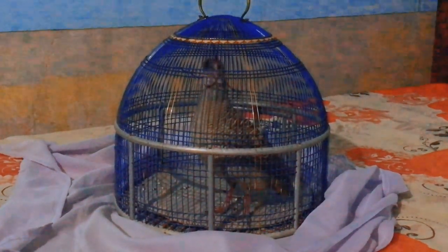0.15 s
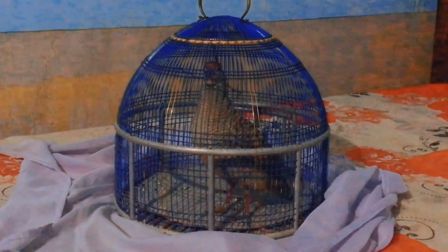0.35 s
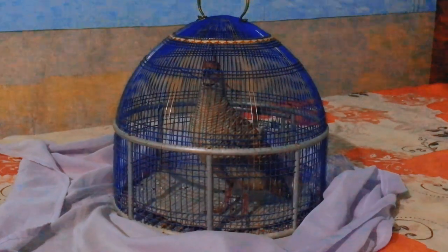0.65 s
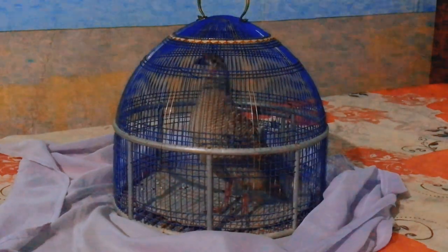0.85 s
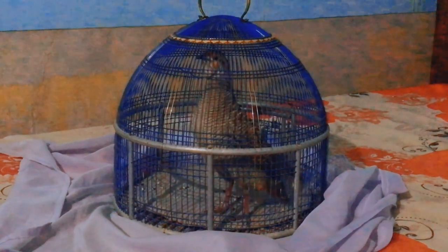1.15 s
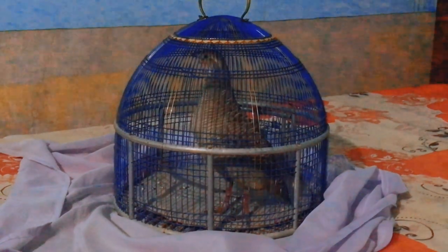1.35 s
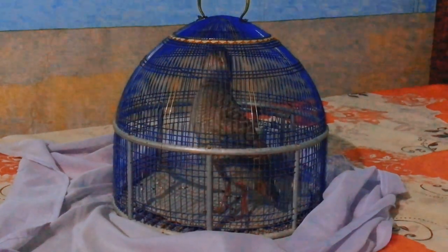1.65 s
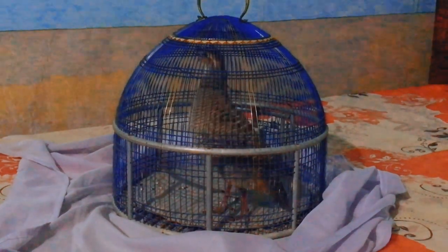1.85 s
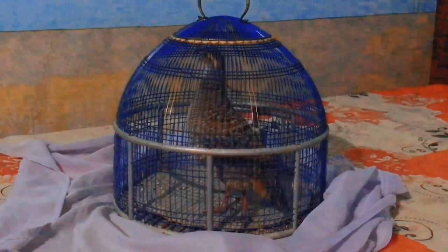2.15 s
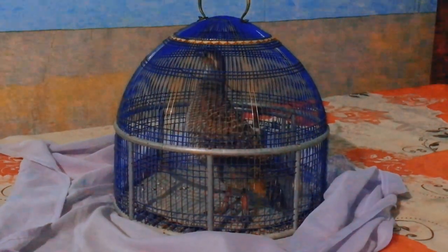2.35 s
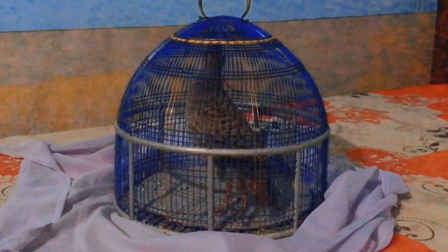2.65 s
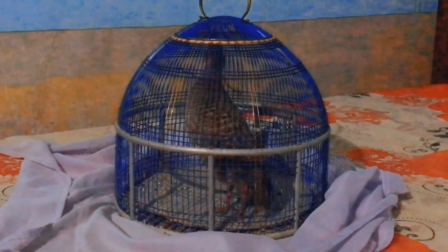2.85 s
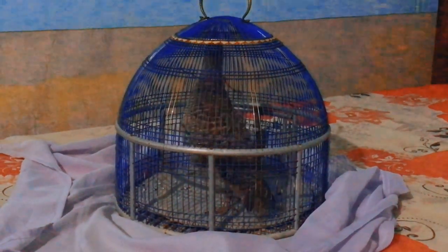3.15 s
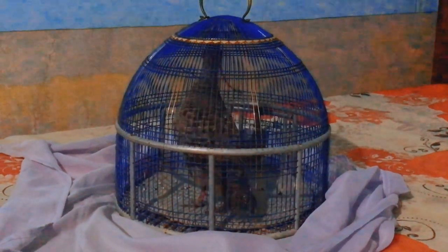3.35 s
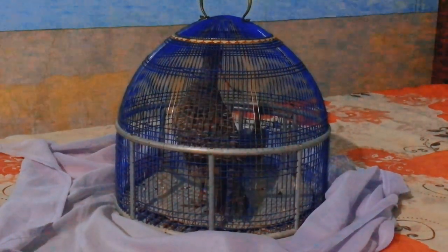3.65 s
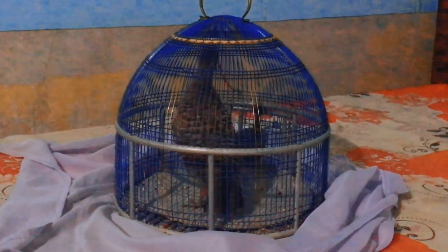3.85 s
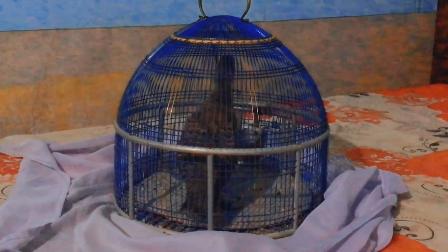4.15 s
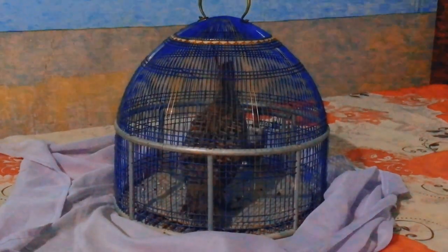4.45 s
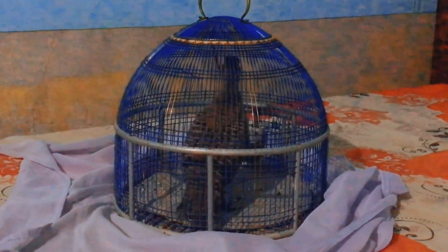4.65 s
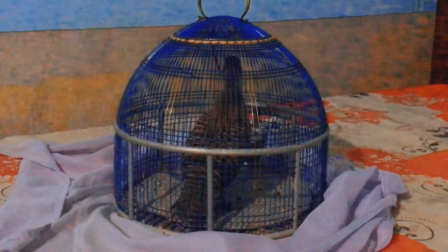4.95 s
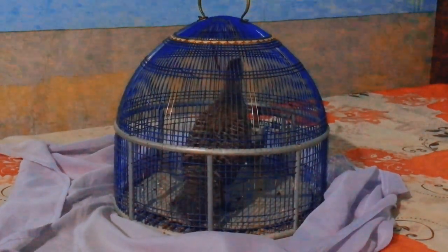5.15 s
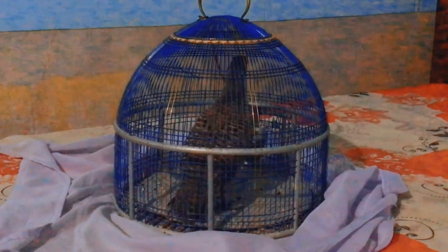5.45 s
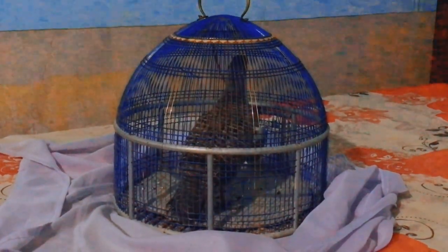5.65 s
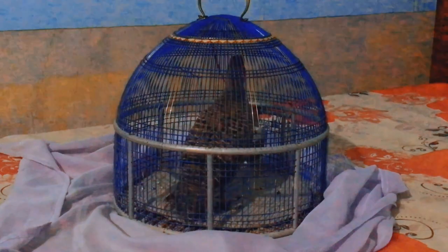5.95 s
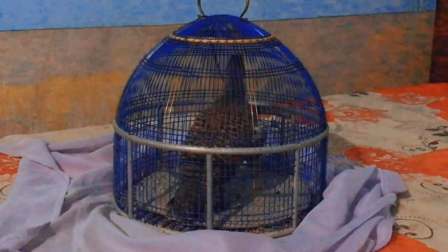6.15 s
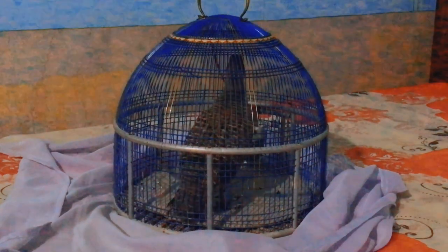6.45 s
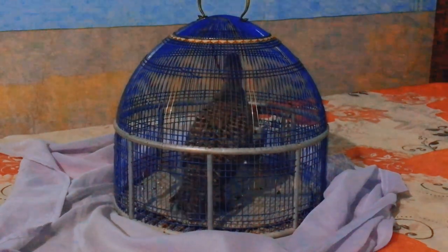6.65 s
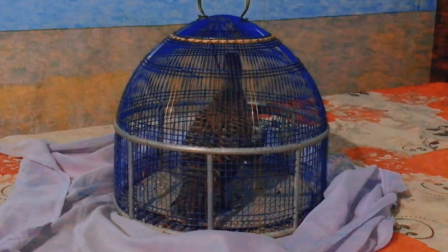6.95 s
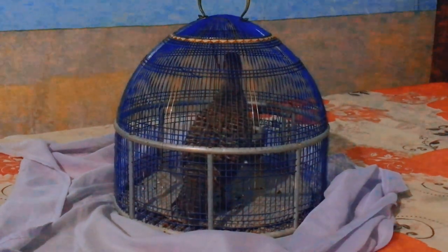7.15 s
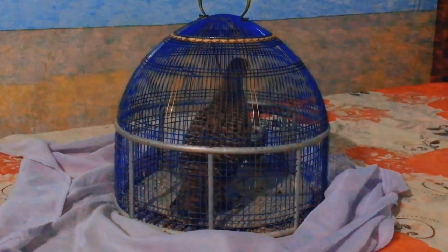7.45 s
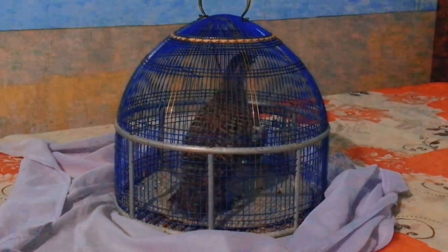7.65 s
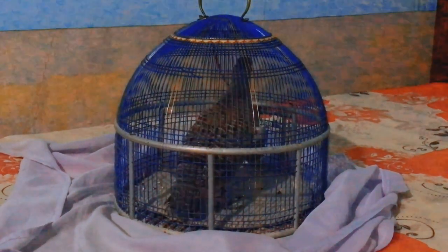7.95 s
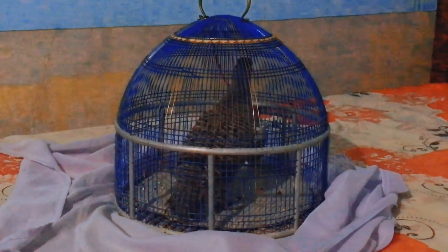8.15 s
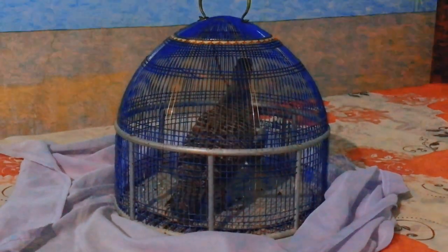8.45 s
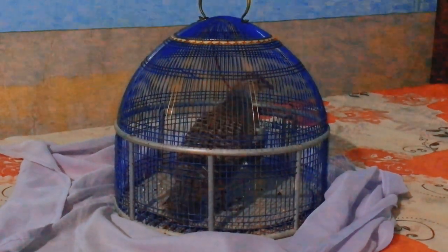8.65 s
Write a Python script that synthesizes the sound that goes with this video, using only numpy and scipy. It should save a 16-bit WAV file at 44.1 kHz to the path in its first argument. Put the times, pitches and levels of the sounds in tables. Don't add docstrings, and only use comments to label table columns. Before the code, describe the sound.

A caged partridge-like bird gives loud, harsh croak-and-whistle calls in an echoing room, with low clucks between, faint distant bird whistles and soft machine hum.

```python
import sys
import numpy as np
from scipy import signal
from scipy.fft import rfft, irfft, next_fast_len
from scipy.io import wavfile
from scipy.ndimage import uniform_filter1d

SR = 44100
rng = np.random.default_rng(int(sys.argv[2]) if len(sys.argv) > 2 else 0)


def waveform_to_disk(signal):
    frames = np.transpose(np.atleast_2d(signal))
    scaled = np.clip(frames, -1, 1) * 32767
    samples = np.round(scaled).astype(np.int16)
    wavfile.write(sys.argv[1], SR, samples)


def voltage_ratio(decibels):
    exponent = np.asarray(decibels, float) / 20
    return 10 ** exponent


N = 388962


def on_log(hz, table):
    table_hz, value = np.transpose(table)
    return np.interp(np.log(np.maximum(hz, 1)), np.log(table_hz), value)


def coloured(size, table):
    gain = voltage_ratio(on_log(np.fft.rfftfreq(size, 1 / SR), table))
    x = irfft(rfft(rng.standard_normal(size)) * gain, size)
    return x / np.std(x)


def flutter(size, rate_hz):
    k = max(int(SR / rate_hz), 1)
    smooth = uniform_filter1d(uniform_filter1d(rng.standard_normal(size), k), k)
    return smooth * np.sqrt(1.5 * k)


def room_floor():
    # frequency in Hz, level in dB per Hz.
    floor_colour = [(25, -16), (60, -4), (140, -1), (220, -5), (300, -10), (500, -15), (1000, -20),
                    (2000, -25), (4000, -35), (7000, -54), (15800, -62)]
    return voltage_ratio(-55.5 + 0.52 * flutter(N, 4)) * coloured(N, floor_colour)


def input_hiss():
    # frequency in Hz, level in dB per Hz.
    hiss_colour = [(500, -8), (3000, -4), (6500, -5), (7100, 3), (7700, -6), (15500, -7)]
    return voltage_ratio(-66) * coloured(N, hiss_colour)


def narrow_hum(size, hz, width_hz):
    skirt_hz = 3 * width_hz
    return coloured(size, [(1, -90), (hz - skirt_hz, -40), (hz, 0), (hz + skirt_hz, -40), (4 * hz, -90)])


def machine_hum():
    # pitch in Hz, width in Hz, level in dB.
    steady = [(76, 13, -62), (131, 31, -61), (181, 26, -65), (355, 26, -72.5)]
    # start in seconds, length in seconds, pitch in Hz, level in dB.
    surges = [(.25, .42, 356, -53), (.42, .2, 186, -52.5), (.72, .28, 184, -51), (0.711, 0.69, 76, -59.5),
              (1.15, 0.69, 131, -50), (1.15, .6, 177.7, -54.5), (1.32, .25, 357, -54.5),
              (2.196, 0.257, 76, -60.5), (6.9, .3, 125, -53), (7.1, 1.07, 81, -58.5),
              (4.004, 1.6, 70, -60.5), (8.3, .45, 145, -51.5)]
    wander_db, wander_hz, surge_width_hz = 4, 3, 16
    out = np.zeros(N)
    for hz, width_hz, db in steady:
        out += voltage_ratio(db + wander_db * flutter(N, wander_hz)) * narrow_hum(N, hz, width_hz)
    for start_s, length_s, hz, db in surges:
        size, i = int(length_s * SR) // 2 * 2, int(start_s * SR)
        out[i:i + size] += voltage_ratio(db) * np.sqrt(np.hanning(size)) * narrow_hum(size, hz, surge_width_hz)
    return out


def add_syrinx_note(out, start_s, rows, beak, bright_db=0., chest_db=0.):
    # frequency in Hz, level in dB.
    whistle_throat = [(1000, 8), (2700, -3.5), (4000, -13.5), (5000, -15.5), (5350, -8), (7500, -28.5),
                      (10000, -22), (13000, -22.5), (16000, -29)]
    rasp_db, rasp_hz = 3.5, 220
    rows = np.array(rows, float)
    t = np.arange(int(rows[-1, 0] * SR)) / SR
    size = len(t)
    hz, whole_db, over_db, half_db, quarter_db, rough = (np.interp(t, rows[:, 0], c) for c in rows.T[1:])
    jitter = .005 * flutter(size, 200) + .095 * rough * flutter(size, 800)
    quarter_hz = hz * (1 + jitter) / 4
    k = np.arange(1, 33)[:, None]
    line_hz = k * quarter_hz
    whistle_db = whole_db + (k > 4) * over_db + on_log(line_hz, whistle_throat)
    whistle_db = np.where(k % 4 == 0, whistle_db, -200.)
    skipped_db = np.where(k % 2 == 0, half_db, quarter_db) + on_log(line_hz, beak)
    lines = (voltage_ratio(whistle_db) + voltage_ratio(skipped_db)) * (line_hz < .36 * SR)
    phase = 2 * np.pi * np.cumsum(quarter_hz) / SR
    tone = np.sum(lines * np.sin(k * phase + k * k), axis=0)
    tone = tone * voltage_ratio(3.5 * rough * flutter(size, 300))
    breath = 0.79 * rough * voltage_ratio(half_db) + 0.1 * voltage_ratio(whole_db + 0.67 * over_db)
    breath = breath * (1 + np.sin(2 * phase)) * coloured(size, beak)
    note = (np.sqrt(2) * tone + breath) * voltage_ratio(rasp_db * rough * flutter(size, rasp_hz))
    note = note * np.clip((t[-1] - t) / .005, 0, 1)
    size = next_fast_len(size + 1024, True) // 2 * 2
    body = [(300, -40), (430, 0), (1000, chest_db), (1300, chest_db), (1700, 0), (6500, 0), (9000, bright_db)]
    radiated = voltage_ratio(on_log(np.fft.rfftfreq(size, 1 / SR), body))
    i = int(start_s * SR)
    out[i:i + size] += irfft(rfft(note, size) * radiated, size)


def clucks():
    # start in seconds, length in seconds, pitch in Hz, level in dB, hoarseness 0-1.
    opening = [
        (.147, .07, 590, -22.5, .5),
    ]
    second = [
        (.865, 0.11, 576, -25.5, .6),
    ]
    later = [
        (1.994, 0.061, 496.7, -28.5, .6),
        (4.910, 0.058, 562.5, -33.5, 0.78),
        (5.60, 0.039, 504, -36.5, 0.76),
        (6.275, 0.053, 562, -34.5, 0.58),
        (6.99, .044, 517.7, -37, .77),
        (7.99, 0.045, 485.5, -38.5, 0.88),
    ]
    # frequency in Hz, level in dB.
    tuned_throat = [(300, -33), (600, -40.5), (1250, 0.5), (1750, 9.5), (2300, -7.5), (3500, -18),
                    (5000, -33), (8000, -27.5), (16000, -45)]
    wide_throat = [(300, -43.5), (550, -20), (1100, -1), (1600, 4), (2250, -1.5), (2700, -20), (3500, -18),
                   (5000, -31.5), (8000, -31), (16000, -38)]
    shut_beak = [(300, -39), (550, -31.5), (1150, 0), (1750, 7), (2300, -8.5), (3500, -13.5), (5000, -38),
                 (8000, -36), (16000, -58)]
    out = np.zeros(N)
    for table, beak, sag in ((opening, tuned_throat, .13), (second, wide_throat, .37), (later, shut_beak, .13)):
        for start_s, length_s, hz0, db, rough in table:
            hz1 = hz0 * (1 - sag * rough)
            shape = [(0, .9 * hz0, -22), (.012, hz0, -3), (length_s / 2, (hz0 + hz1) / 2, 0),
                     (length_s, hz1, -4), (length_s + 0.023, 0.45 * hz1, -25)]
            rows = [(t, 4 * hz, -120, 0, db + d, db + d, rough) for t, hz, d in shape]
            add_syrinx_note(out, start_s, rows, beak)
    return out


def room():
    # frequency in Hz, ring time (60 dB) in seconds.
    ring_time = [(300, 0.82), (1200, 0.96), (2000, 0.76), (2800, 0.69), (5000, 0.61), (10000, 0.37),
                 (16000, .3)]
    first_echo_s, build_up_s = .012, .045
    t = np.arange(int(1.5 * SR)) / SR
    f = np.maximum(np.fft.rfftfreq(len(t), 1 / SR), 1)
    noise = rfft(rng.standard_normal(len(t)))
    out = np.zeros(len(t))
    for hz in 100 * 2 ** np.arange(0, 7.7, 1 / 3):
        band = irfft(noise * np.clip(1 - 3 * abs(np.log2(f / hz)), 0, 1), len(t))
        out += band * voltage_ratio(-60 * t / on_log(hz, ring_time))
    out = out * np.clip((t - first_echo_s) / build_up_s, 0, 1)
    return out / np.sqrt(np.sum(out ** 2))


def far_bird():
    # start in seconds, length in seconds, first pitch in Hz, last pitch in Hz, level in dB.
    whistles = [
        (0.52, 0.1, 3380, 4350, -39.5),
        (0.652, 0.051, 4750, 4680, -49),
        (0.707, 0.051, 4580, 4520, -52.5),
        (2.298, 0.15, 3450, 4180, -35),
        (3.495, 0.14, 3429, 4330, -50),
        (3.645, 0.068, 4661, 4670, -49),
        (4.995, 0.11, 4020, 4165, -46.5),
        (7.315, .11, 3360, 4470, -47),
        (7.405, .07, 4750, 4808, -53),
    ]
    out = np.zeros(N)
    for start_s, length_s, hz0, hz1, db in whistles:
        u = np.linspace(0, 1, int(length_s * SR))
        hz = hz0 + (hz1 - hz0) * u ** .7 + 70 * flutter(len(u), 250)
        phase = 2 * np.pi * np.cumsum(hz) / SR
        tone = np.sin(phase) + voltage_ratio(-19.5) * np.sin(3 * phase)
        i = int(start_s * SR)
        out[i:i + len(u)] += voltage_ratio(db) * np.sin(np.pi * u) ** 0.21 * tone
    return out


def glide_rows():
    # time in seconds, width in seconds, depth in dB.
    catches = [
        (.018, 0.0019, -5.5),
        (.039, .005, -13.5),
    ]
    glide_s, sag_s, swell_s, overtones_fade_s = .073, .056, .006, .026
    start_share, target_share = 1.035, .64
    t = np.linspace(0, glide_s, 30)
    share = target_share + (start_share - target_share) * np.exp(-t / sag_s)
    db = 7.5 - 185 * t - 7 * np.exp(-t / swell_s)
    for at_s, width_s, depth_db in catches:
        db = db + depth_db * np.exp(-((t - at_s) / width_s) ** 2)
    over_db = -21.5 + 21.5 * np.exp(-t / overtones_fade_s)
    break_off = [(glide_s + .002, .67, -25, -26), (glide_s + .014, .58, -35, -22.5)]
    return [*zip(t, share, db, over_db), *break_off]


def calls():
    # start in seconds, croak in seconds, whistle length in seconds, whistle pitch in Hz, effort in dB.
    full_calls = [
        (1.554, .039, .055, 2466, -6),
        (2.39, 0.037, 0.033, 2681, -7.5),
        (2.803, 0.034, .024, 2633, -7),
        (3.719, .042, .017, 2668, -6.5),
        (4.449, 0.041, .019, 2669, -7),
        (5.110, 0.041, .018, 2658, -6.5),
        (5.819, .039, .021, 2650, -7.5),
        (6.521, 0.038, .021, 2641, -7),
        (7.494, .035, .023, 2630, -7),
    ]
    # frequency in Hz, level in dB.
    open_beak = [(300, -55), (600, -38), (1300, -10), (2000, -11), (2700, 1), (4000, 4.5), (5500, 0),
                 (7000, -4.5), (8200, -18), (10500, -15), (16000, -25.5)]
    long_whistle_s, short_whistle_s, held_db_per_s = .04, .022, -400
    turns_away_s, facing_chest_db = 2.6, 7
    out = np.zeros(N)
    for start_s, on, held, hz, effort_db in full_calls:
        off = on + held
        if held > long_whistle_s:
            glide, flat_hz, bright_db = off + .0032, .88 * hz, 3.5
            db, croak_db = effort_db + .5, effort_db - 16.5
        else:
            glide, flat_hz, bright_db = off + .024, hz, .6
            db = effort_db + 3.5 + held_db_per_s * max(held - short_whistle_s, 0)
            croak_db = effort_db - 10.5
        c = croak_db
        rows = [(0, .94 * flat_hz, db - 60.5, 0, c - 38, c - 28, .3),
                (.007, 1.06 * flat_hz, db - 48, 0, c - 1.5, c - 5, .35),
                (on - .012, 0.95 * flat_hz, db - 42.5, 0, c - 4, c - 13, .5),
                (on - .003, 1.05 * hz, db - 26.5, 0, c - 1.5, c - 16, .5),
                (on + 0.0036, hz, db + 2.0, 0, c - 12, c - 40, .05),
                (off - .001, hz, db, 0, c - 12, c - 40, .05),
                (off + 0.00064, .97 * hz, db - 32.0, 0, c - 5, c - 13, .4),
                (glide - .003, .96 * hz, db - 32, 0, c - 6, c - 14, .4)]
        for t, share, d, over_db in glide_rows():
            rows.append((glide + t, share * hz, effort_db + d, over_db, c - 22 + d, c - 45, .04))
        add_syrinx_note(out, start_s, rows, open_beak, bright_db, facing_chest_db * (start_s < turns_away_s))
    return out


def after_notes():
    # start in seconds, lead-in in seconds, first pitch in Hz, last pitch in Hz, level in dB.
    notes_sung = [
        (1.845, 0.037, 1804, 1683, -17.5),
        (3.070, 0.02, 2080, 1818, -14.5),
        (3.212, .027, 1850, 1612, -20.5),
        (4.020, 0.022, 2032, 1968, -14.5),
        (4.169, 0.025, 1909, 1497, -22.5),
        (4.758, .026, 2004, 1880, -15.5),
        (5.434, 0.032, 1908, 1806, -18),
        (6.129, .028, 1988, 1733, -17),
        (6.838, .031, 1869, 1568, -19.5),
        (7.832, .031, 1981, 1632, -17),
    ]
    # frequency in Hz, level in dB.
    half_open = [(300, -22.5), (600, -32.5), (1200, -0.5), (1800, 6), (2700, -1), (4000, -8), (5500, -14.5),
                 (8000, -21), (11000, -60), (16000, -33)]
    clear_s, usual_lead_s, hook_db_per_s = 0.03, 0.027, 698.5
    out = np.zeros(N)
    for start_s, lead, hz0, hz1, db in notes_sung:
        end = lead + clear_s
        hook_db = db + hook_db_per_s * min(lead - usual_lead_s, .006)
        rows = [(0, .9 * hz0, db - 43.5, -8, db - 35.5, db - 32.5, .6),
                (.01, hz0, hook_db - 16.5, -8, db - 14, db - 18, .5),
                (lead - .003, 1.5 * hz0, hook_db - 4.0, -10, db - 15, db - 16.5, .15),
                (lead, hz0, db - .5, -5, db - 24, db - 19, .15),
                (end, hz1, db - 8.5, -12, db - 18.5, db - 16, .3),
                (end + 0.00598, .88 * hz1, db - 13.0, -15, db - 18.0, db - 30.0, .5),
                (end + .016, .8 * hz1, db - 17.5, -15, db - 25.0, db - 29.5, .6)]
        add_syrinx_note(out, start_s, rows, half_open)
    return out


def scene():
    # frequency in Hz, level in dB.
    side_on = [(2500, 0), (5000, -4), (12000, -5.5)]
    # delay in seconds, level in dB.
    wall_echoes = [
        (.021, -11.5),
        (.033, -11),
    ]
    bird = clucks() + calls() + after_notes()
    direct = irfft(rfft(bird) * voltage_ratio(on_log(np.fft.rfftfreq(N, 1 / SR), side_on)), N)
    early = sum(voltage_ratio(db) * np.roll(bird, int(delay_s * SR)) for delay_s, db in wall_echoes)
    ringing = signal.fftconvolve(voltage_ratio(-8.5) * bird + far_bird(), room())[:N]
    return (direct + early + ringing + room_floor() + input_hiss() + machine_hum())[None]


def top_cut(x):
    return signal.sosfilt(signal.butter(12, 16470, fs=SR, output="sos"), x)


def record(dry):
    # time in seconds, gain in dB.
    gain_steps = [
        (0, -5),
        (2.44, -4),
        (2.447, -14.5),
        (8.82, -14.5),
    ]
    x = dry * voltage_ratio(np.interp(np.arange(N) / SR, *np.transpose(gain_steps)))
    x = x / (1 + abs(x / .97) ** 8) ** .125
    return top_cut(x)


dry = scene()
out = record(dry)
waveform_to_disk(out)
```